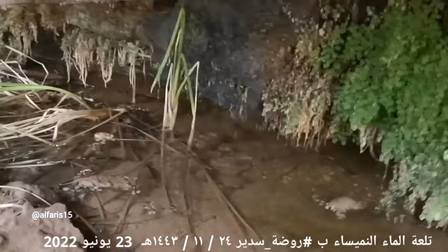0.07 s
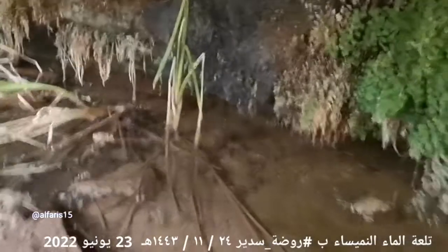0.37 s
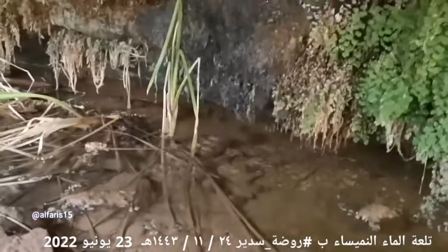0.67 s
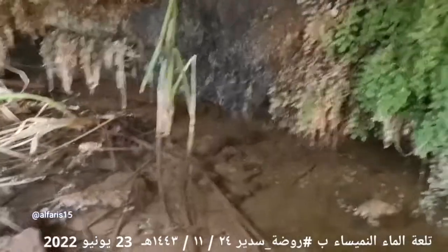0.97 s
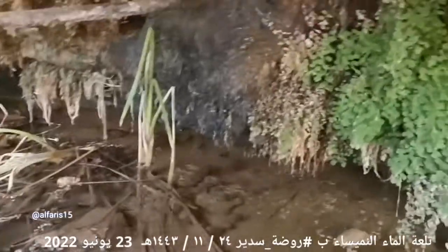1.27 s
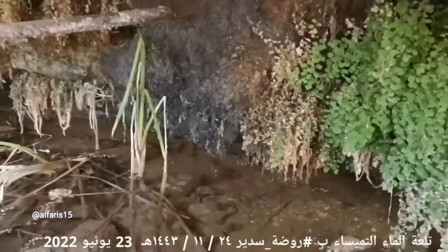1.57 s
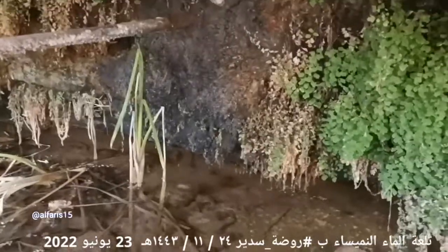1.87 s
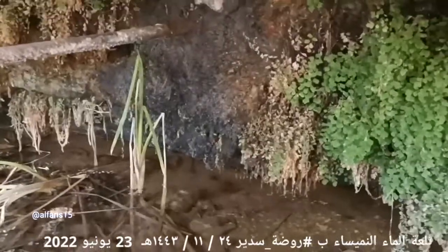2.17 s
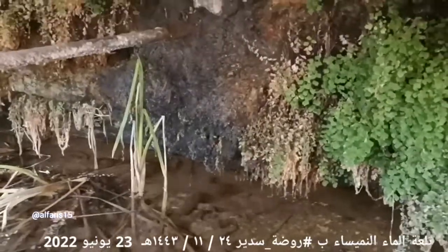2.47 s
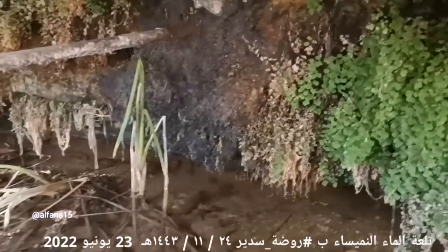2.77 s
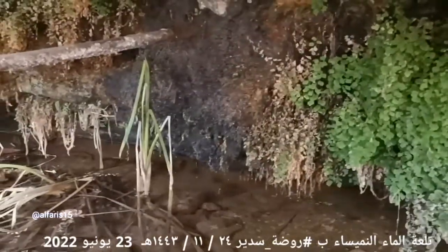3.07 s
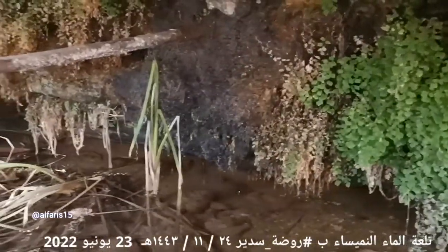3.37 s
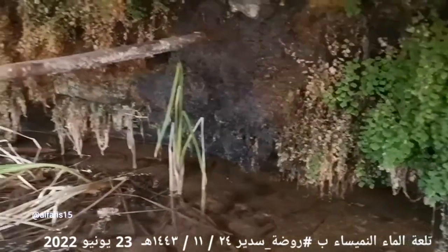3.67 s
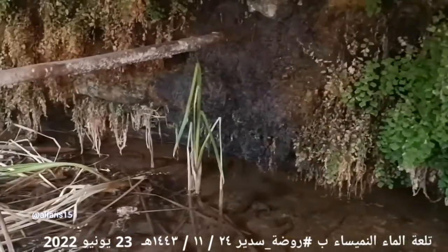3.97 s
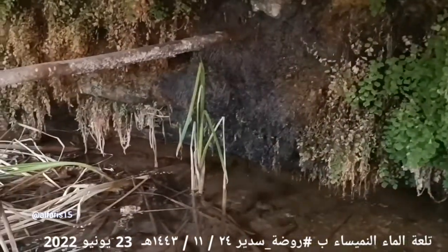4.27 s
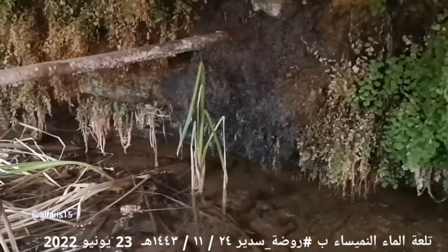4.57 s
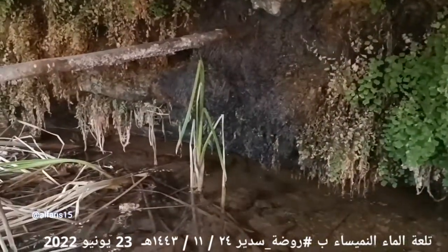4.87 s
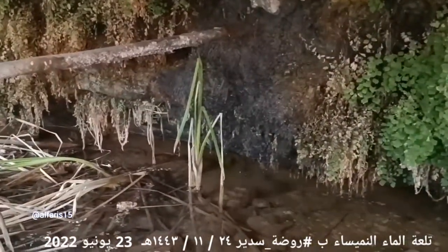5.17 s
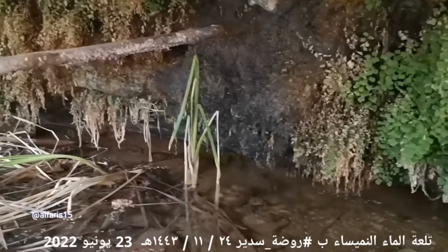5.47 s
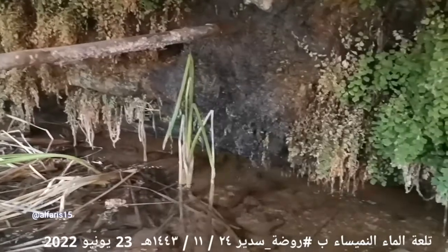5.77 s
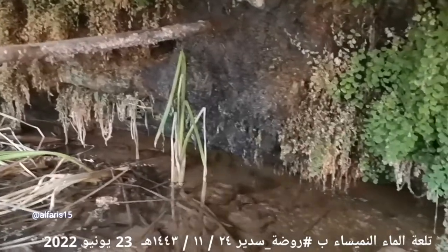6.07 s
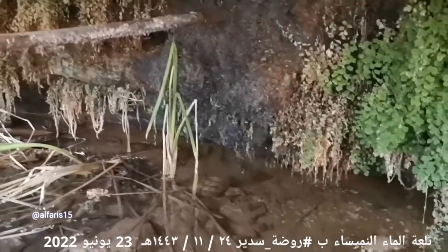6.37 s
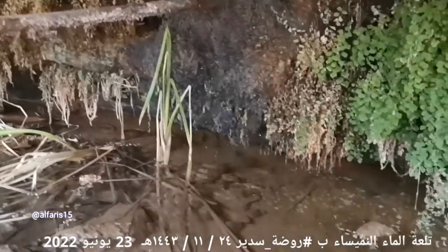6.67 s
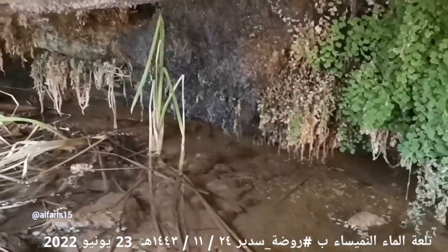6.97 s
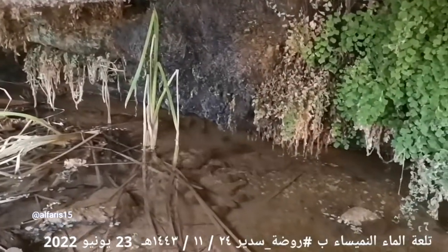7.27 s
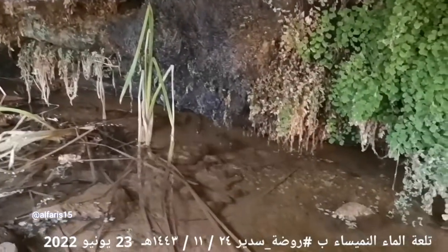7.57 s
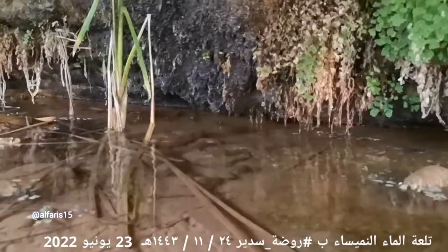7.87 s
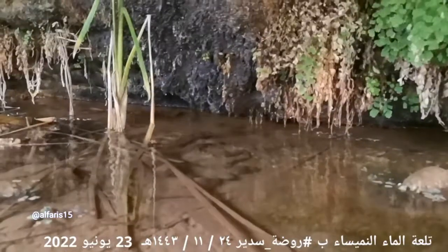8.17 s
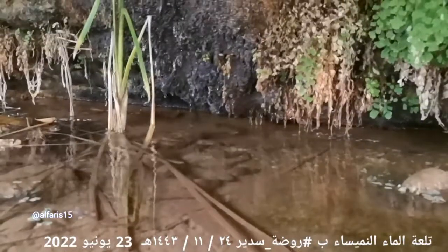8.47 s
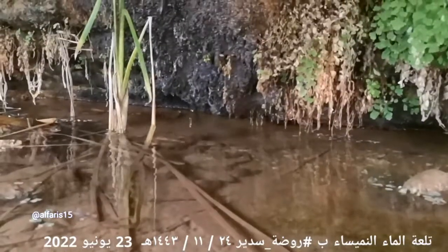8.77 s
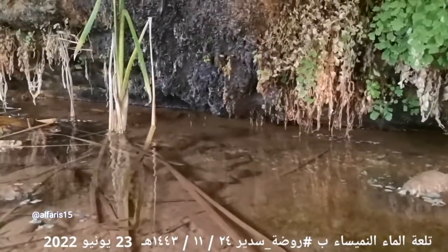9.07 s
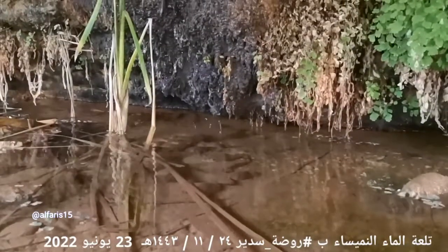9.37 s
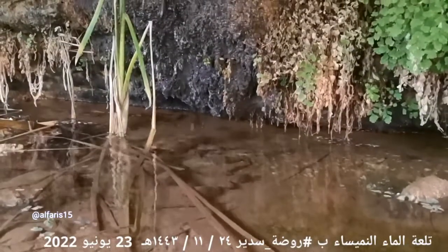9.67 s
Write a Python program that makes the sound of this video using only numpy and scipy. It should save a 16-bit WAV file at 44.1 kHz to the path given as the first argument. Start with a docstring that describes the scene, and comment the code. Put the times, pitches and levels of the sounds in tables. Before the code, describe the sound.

Drops plink into a pool and splat on wet stone while a small bird twitters further off, with one early microphone bump.

```python
"""Water drips from a wet rock wall and hanging roots into a shallow pool, in a rock hollow outdoors.
From the start, seeping water hisses over a low rumble and a small bird twitters further off.
The microphone is bumped almost at once. Then two steady drips and stray drops slap the pool and trap
ringing bubbles, while others splat on stone and leaves. Near the end the sound drops out briefly;
it comes back with a louder hiss and a faint drone, and the dripping goes on."""
import sys
import numpy as np
from scipy import signal
from scipy.fft import rfft, irfft
from scipy.io import wavfile
from scipy.ndimage import uniform_filter1d

SR = 44100
rng = np.random.default_rng(int(sys.argv[2]) if len(sys.argv) > 2 else 0)


def int16_out(signal):
    """Quantize to a 16-bit WAV file."""
    q = np.round(np.clip(np.atleast_2d(signal).T, -1, 1) * 32767)
    wavfile.write(sys.argv[1], SR, q.astype(np.int16))


N = 433062
TIME = np.arange(N) / SR
AGE = np.arange(int(.3 * SR)) / SR  # seconds since one short sound began
DROPOUT_START_S, DROPOUT_END_S = 7.622, 8.022


def undb(db):
    """Turn decibels into a factor to multiply by."""
    return 10 ** (np.asarray(db) / 20)


def unit(x):
    """Scale to an average (rms) level of 1."""
    return x / np.sqrt(np.mean(x ** 2))


def crest(x, size=176):
    """Scale so that the loudest few milliseconds have level 1."""
    power = np.mean(np.atleast_2d(x) ** 2, axis=0)
    return x / np.sqrt(uniform_filter1d(power, size).max())


def fade(t60):
    """A fade that falls by 60 dB in t60 seconds."""
    return np.exp(-np.log(1000) * AGE / max(t60, .002))


def noise(spectrum, size):
    """Noise of level 1, shaped by (frequency [Hz], level [dB]) points."""
    hz, db = np.transpose(spectrum)
    gain = undb(np.interp(np.log(np.fft.rfftfreq(size, 1 / SR) + 1), np.log(hz), db))
    return unit(irfft(rfft(rng.standard_normal(size)) * gain, size))


def burst(spectrum, t60):
    """A crack of noise that swells within a millisecond and dies quickly."""
    return crest(noise(spectrum, len(AGE)) * fade(t60) * (1 - fade(.007)))


def resonate(x, hz, q):
    """Keep the sound near one pitch; a higher q makes the band narrower."""
    return signal.lfilter(*signal.iirpeak(min(hz, SR / 3), max(q, .8), SR), x)


def keep_range(x, kind, hz, order=3):
    """Let only the lows, the highs or a band through."""
    return signal.sosfilt(signal.butter(order, hz, kind, fs=SR, output="sos"), x)


def wander(per_second):
    """A smooth random curve that strays about 1 either way."""
    step = int(SR / per_second)
    return 1.29 * uniform_filter1d(np.repeat(rng.standard_normal(N // step + 1), step), step)[:N]


def add(out, s, x):
    """Mix a stereo sound in at s seconds."""
    start = max(int(s * SR), 0)
    out[:, start:start + x.shape[1]] += x[:, :max(N - start, 0)]


def echoes(wall_db, wall_t60=0.089, tail_db=-17, tail_t60=0.49, lag_s=.00008):
    """The path to the stereo microphone: direct sound, close echoes off the rock and a faint tail."""
    chance = rng.standard_normal((4, len(AGE)))
    close = chance[:2] ** 3 * fade(wall_t60) * (AGE > .002)  # cubing makes noise spiky
    tail = chance[2:] * fade(tail_t60)
    path = (undb(wall_db) * unit(close) + undb(tail_db) * unit(tail)) / np.sqrt(len(AGE))
    path[0, int(lag_s * SR)] += 1  # the direct sound reaches the left side later
    path[1, 0] += 1
    return path


def heard(x, path, pan_db):
    """A sound at the end of a path, level 1 at its loudest. Pan is left level minus right level."""
    echoed = signal.fftconvolve(x[None], path, axes=1)[:, :len(x)]
    return crest(echoed * undb(np.array([[pan_db], [-pan_db]]) / 2))


def far_noise():
    """Low noise from far off, probably traffic, that swells and eases."""
    # its tone: (frequency [Hz], level [dB])
    spectrum = [(40, -32.5), (100, -2), (135, 1.5), (200, -9), (270, -12.5), (400, -28.5), (1500, -64)]
    # its swell: (time [s], level [dB])
    swell = [(0, -73.5), (2.6, -68), (4.5, -62), (6, -64), (7.6, -67)]
    return noise(spectrum, N) * undb(np.interp(TIME, *np.transpose(swell)))


def drone(q=9):
    """A faint, wavering far drone: noise narrowed to a few low pitches."""
    # its resonances: (pitch [Hz], level [dB])
    tones = [(97, -57.5), (167, -61.5), (255, -74.5)]
    return sum(undb(db) * unit(resonate(resonate(rng.standard_normal(N), hz, q), hz, q))
               for hz, db in tones)


def rumble_and_hiss(spectrum, rumble_db, hiss_db, swell_db=1.5, flicker_db=1.85):
    """Air rumbles at the microphone, alike on both sides; trickling water hisses all around."""
    # the rumble's rise and fall: (time [s], relative level [dB])
    rumble_curve = [(0, -45), (0.08, -57), (0.55, -61), (2.3, -61), (4.4, -62.5), (5.2, -57.5),
                    (5.45, -54.5), (5.8, -59.5), (6.4, -54), (6.9, -60), (7.3, -57.5), (9.8, -57)]
    middle = noise(spectrum, N)
    side = 1.01 * keep_range(noise(spectrum, N), "high", 300, order=2)
    stereo = np.array([middle + side, middle - side])
    lows = signal.sosfiltfilt(signal.butter(2, 400, fs=SR, output="sos"), stereo)
    rumble = lows / keep_range(middle, "band", [40, 300]).std()
    hiss = (stereo - lows) / keep_range(middle, "band", [1500, 10000]).std()
    rumble *= undb(np.interp(TIME, *np.transpose(rumble_curve)) + rumble_db + swell_db * wander(5))
    return rumble + hiss * undb(hiss_db + flicker_db * wander(22))


def background():
    """Rumble and hiss, with far noise before the dropout and a drone after it."""
    # tone of the air and trickle before the dropout: (frequency [Hz], level [dB])
    early_spectrum = [(12, -54.5), (20, 6.5), (45, 1), (120, -7), (262, -22.5), (399, -32), (590, -37.5),
                      (2020, -29.5), (3340, -40.5), (5230, -39), (6360, -43.5), (7730, -37), (10200, -51),
                      (14700, -51.5), (16000, -52.5)]
    # their tone after it: (frequency [Hz], level [dB])
    late_spectrum = [(12, -57), (20, 12.5), (86, -1), (134, -8.5), (172, -6), (255, -14.5), (422, -27.5),
                     (660, -34.5), (2080, -26), (4300, -31), (7520, -30), (9140, -34), (10800, -45.5),
                     (14700, -46), (16000, -67)]
    early = rumble_and_hiss(early_spectrum, rumble_db=2.5, hiss_db=-72) + far_noise()
    late = rumble_and_hiss(late_spectrum, rumble_db=1, hiss_db=-63) + drone()
    return np.where(TIME < DROPOUT_END_S, early, late)


def splat(hz, t60=0.015, q=1.53, spray_db=-1, snap_db=-20):
    """A drop snaps on a wet surface and throws a spray of tiny droplets."""
    chance = rng.standard_normal((2, len(AGE)))
    snap = crest(chance[0] * fade(0.0074))
    spray = undb(spray_db) * crest(chance[1] ** 3 * fade(t60) * (1 - fade(0.0025)))
    wet = resonate(resonate(snap + spray, hz, q), hz, q)
    wet = keep_range(wet, "low", 9300, order=4)
    return crest(wet) + undb(snap_db) * crest(resonate(snap, hz, 1))


def seepage(spatter_db=-71, moss_db=-70, spread_db=4, count=250):
    """Many faint drips all along the wall: fine spatter, and dull pats on moss."""
    out = np.zeros((2, N))
    for when, size, pitch, side, kind in rng.random((count, 5)):
        if kind < .8:
            drip, db = splat(3800 + 4800 * np.sqrt(pitch), q=2.6), spatter_db
        else:
            drip, db = splat(1750 + 650 * pitch, q=4.4), moss_db
        db += spread_db * min(-np.log(1 - size), 3)  # a few drips stand out
        path = echoes(wall_db=2.5, wall_t60=0.097, lag_s=.0004)
        add(out, when * N / SR, undb(db) * heard(drip, path, pan_db=10 * side - 7))
    return out


def bird_notes(gap_s=.048, lower_hz=221.3, growth_db=5.5):
    """Time, level and pitch of each note: lead-in notes grow louder, then a higher one ends the call."""
    # calls: (last note's time [s], its level [dB], its pitch [Hz], note count, lead-in against it [dB])
    calls = [(0.075, -47.5, 5030, 2, 2), (1.356, -51.5, 5030, 3, -3), (2.229, -50, 4940, 3, -7),
             (2.941, -49.5, 4940, 2, -10), (3.15, -61.5, 4920, 2, -6), (3.746, -43.5, 4860, 2, -8),
             (4.55, -47, 5124, 4, -7.5), (5.12, -43.5, 4790, 2, -19), (5.977, -50, 5030, 3, -3.5),
             (6.571, -50, 4870, 2, -8.5), (6.772, -60.5, 4850, 2, -8), (7.354, -53, 5050, 2, -10),
             (8.816, -54, 4940, 2, -14), (9.263, -59, 4930, 2, -16), (9.744, -60, 5050, 2, -10)]
    for s, db, hz, count, lead_db in calls:
        yield s, db, hz
        for k in range(round(count) - 1):  # counting back from the last note
            yield s - (k + 1) * gap_s, db + lead_db - k * growth_db, hz - lower_hz


def bird(gain_db=-1, glide_s=0.0091, width_s=.0065, peak_s=.022, fall_hz=280, rough_hz=110):
    """Short whistled notes that flick downward, scattered by the rock."""
    out = np.zeros((2, N))
    from_peak = AGE - peak_s
    for s, db, hz in bird_notes():
        waver = rough_hz * noise([(400, -5.5), (1500, -22)], len(AGE))
        pitch = hz - fall_hz * np.tanh(from_peak / glide_s) + waver
        note = np.sin(2 * np.pi * np.cumsum(pitch) / SR) * np.exp(-(from_peak / width_s) ** 2)
        path = echoes(wall_db=5, wall_t60=0.069, tail_db=-23.5, lag_s=.00042)
        add(out, s - peak_s - .004, undb(db + gain_db) * heard(note, path, pan_db=-2))
    return out


def ring(hz, t60, rise=0.007, swell_cycles=9):
    """The ring of a bubble, crater or case: it swells fast, then fades as its pitch rises a little."""
    pitch = hz * (1 + rise * (.5 - fade(t60 * 2)))
    tone = np.sin(2 * np.pi * np.cumsum(pitch) / SR) * fade(t60) * (1 - fade(swell_cycles / hz))
    return crest(keep_range(tone, "high", .75 * hz))


def microphone_bump(sway_db=-31.5, sway_hz=25, sway_t60=0.74, thump_db=-38, thump_t60=.66):
    """Knocks ring the microphone's case briefly; the jolt leaves a thump and a deep sway."""
    # knocks: (time [s], level [dB], ring pitch [Hz], ring fade time [s], crack against ring [dB])
    knocks = [(0.2675, -24.5, 1998, 0.017, -4), (.278, -39, 2100, .02, -14),
              (0.2807, -31.5, 1510, 0.016, 6), (0.2839, -35, 920, 0.019, -2)]
    # tone of the case's crack: (frequency [Hz], level [dB])
    case_spectrum = [(60, -9), (170, 1.5), (300, -13), (600, -12.5), (950, -7.5), (2200, -1.5),
                     (3000, -17.5), (6000, -14.5), (8500, -18.5), (10000, -47), (16000, -52)]
    out = np.zeros((2, N))
    for s, db, hz, t60, crack_db in knocks:
        knock = ring(hz, t60) + undb(crack_db) * burst(case_spectrum, t60=0.073)
        add(out, s, undb(db) * heard(knock, echoes(wall_db=-10.5, tail_db=-14.5), pan_db=-6))
    sway = undb(sway_db) * np.sqrt(2) * np.sin(2 * np.pi * sway_hz * AGE) * fade(sway_t60)
    low_noise = noise([(8, -30.5), (30, 7.5), (60, -0.5), (150, -9), (400, -40), (2000, -95)], len(AGE))
    thump = undb(thump_db) * low_noise * fade(thump_t60) * (1 - fade(.02))
    add(out, .277, np.tile(sway + thump, (2, 1)))
    return out


def plinks(level_db=-65, spread_db=6, low_hz=2800, high_hz=3800, ring_t60=.014, count=16):
    """Small drops trap tiny bubbles that ring high."""
    out = np.zeros((2, N))
    for when, size, pitch in rng.random((count, 3)):
        bubble = ring(low_hz + (high_hz - low_hz) * pitch, ring_t60)
        plink = heard(bubble, echoes(wall_db=0.5, wall_t60=0.036), pan_db=1)
        add(out, when * N / SR, undb(level_db + spread_db * (size - .5)) * plink)
    return out


def splats(gain_db=1.5, pan_db=-1.5):
    """Drops land on stone and leaves and echo off the wall."""
    # landings: (time [s], relative level [dB], strongest frequency [Hz])
    landings = [(0.4293, -59, 6940), (0.699, -49, 6140), (1.051, -60, 6500), (1.326, -55, 7700),
                (1.7404, -58, 5550), (1.8197, -62, 5440), (2.045, -60, 9500), (2.0793, -64.5, 9400),
                (2.293, -60.5, 5940), (3.2283, -56, 4530), (3.3902, -55, 5670), (3.4903, -60, 7100),
                (3.5292, -59, 7000), (3.8557, -43, 5100), (3.897, -52, 5500), (3.971, -56, 8600),
                (4.7438, -56, 4830), (4.9358, -38, 5830), (5.026, -55, 8600), (5.108, -55.5, 7900),
                (5.447, -60, 8160), (5.715, -60.5, 6960), (6.631, -55, 7500), (7.012, -48, 7500),
                (7.071, -58, 7900), (7.117, -58, 7900), (7.163, -56.5, 9100), (8.024, -54, 6900),
                (8.272, -55, 5500), (8.695, -57, 7150), (9.2746, -58, 7100), (9.6087, -54, 7000)]
    out = np.zeros((2, N))
    for s, db, hz in landings:
        landing = heard(splat(hz), echoes(wall_db=2.5, wall_t60=0.099, lag_s=0.00045), pan_db)
        add(out, s, undb(db + gain_db) * landing)
    return out


def pool_drop(bubble_db, hz, slap_db, tick_db, pan_db, slap_path, crater_hz=1020, crater_db=-16.5):
    """A drop ticks on the water, slaps open a briefly ringing crater and leaves a bubble."""
    # tone of the slap: (frequency [Hz], level [dB])
    slap_spectrum = [(300, -62), (750, -42), (1000, -31.5), (1400, 4), (1900, 6), (2200, 5), (2600, 2.5),
                     (3100, -13.5), (6000, -33)]
    # tone of the tick: (frequency [Hz], level [dB])
    tick_spectrum = [(600, -62), (1500, -28), (3000, 5), (4500, 1), (8000, -1), (10000, -13), (16000, -22)]
    bubble = ring(hz, t60=.045 * (1000 / hz) ** 1.36)  # big, low bubbles ring longer
    bubble = heard(bubble, echoes(wall_db=3.5, wall_t60=0.091, lag_s=.00016), pan_db)
    crater = undb(crater_db) * ring(crater_hz, t60=0.12)
    slap = heard(burst(slap_spectrum, t60=0.021) + crater, slap_path, pan_db)
    tick = burst(tick_spectrum, t60=0.0082)
    tick = heard(tick, echoes(wall_db=6.5, wall_t60=0.14, lag_s=.0004), pan_db / 2)
    return undb(bubble_db) * bubble + undb(slap_db) * slap + undb(tick_db) * tick


def beats(runs):
    """Time and pan of each drop of a steady drip: one run before the dropout, one after."""
    for (first, period, pan_db), end in zip(runs, (DROPOUT_START_S, N / SR)):
        for s in np.arange(first, end, period):
            yield s, pan_db


def pool(gain_db=-0.5):
    """Two spots drip into the pool like clocks, one quick and one slow, among stray drops."""
    # runs of the quick drip: (first drop [s], time between drops [s], pan [dB])
    quick_runs = [(0.4105, 0.4966, -5.5), (8.442, 0.5035, 1)]
    # runs of the slow drip: (first drop [s], time between drops [s], pan [dB])
    slow_runs = [(0.427, 0.8504, -10), (8.025, 0.847, -8)]
    # each quick drop traps its own bubble: (delay [s], bubble [dB], pitch [Hz], slap [dB], tick [dB])
    quick_drops = [(.002, -47, 2500, -47, -71), (0, -52.5, 1216, -52, -61),
                   (-.001, -40.5, 2198, -44, -55.5), (0.00062, -42, 1060, -51.5, -67),
                   (.001, -51.5, 2500, -44, -54), (.002, -42.5, 1320, -49, -53),
                   (0, -49.5, 1116, -50.5, -72), (-0.00057, -44, 990, -47, -51),
                   (-.001, -53.5, 1000, -41.5, -54.5), (-.003, -34, 2250, -38.5, -58),
                   (.001, -44, 1028, -49.5, -58), (0, -52.5, 1150, -50, -60), (.008, -52, 1380, -59, -68),
                   (0, -50, 2510, -50, -55.5), (.004, -43.5, 1350, -55.5, -78), (0, -44, 1360, -51.5, -55),
                   (0, -37.5, 1640, -47, -51), (0, -37, 1206, -47, -50.5)]
    # stray drops: (time [s], bubble [dB], pitch [Hz], slap [dB], pan [dB])
    stray_drops = [(0.347, -51, 2040, -42.5, -7), (0.394, -54, 1050, -54, -1), (0.432, -51, 2110, -52, 0),
                   (0.599, -56, 2720, -78, -2), (0.7262, -53.5, 1270, -58, -5),
                   (1.222, -58.5, 2090, -73, -9), (1.641, -49, 2500, -74, -1),
                   (1.808, -63, 2190, -60.5, -3), (2.327, -58.5, 2200, -68, -10),
                   (3.322, -50.5, 1226, -54, -3), (3.346, -55.5, 1155, -59, -3),
                   (3.507, -56, 2360, -78, -5), (3.7322, -35.5, 2300, -62, -4),
                   (4.207, -69, 2090, -56, -13), (4.643, -51, 2350, -86, -15.5),
                   (4.75, -61.5, 3870, -78, 3), (4.892, -50.5, 2290, -61, 0),
                   (6.214, -43.5, 2210, -48.5, -4), (6.234, -52.5, 1264, -58, -8),
                   (7.038, -56, 3250, -59.5, 3), (7.178, -57, 1033, -72, -5), (8.272, -55, 2070, -67, -6),
                   (8.315, -52, 1900, -61, -3)]
    out = np.zeros((2, N))
    path = echoes(wall_db=-2.5, wall_t60=0.15, lag_s=0.00014)
    for (s, pan_db), (delay, bubble_db, hz, slap_db, tick_db) in zip(beats(quick_runs), quick_drops):
        add(out, s + delay, pool_drop(bubble_db, hz, slap_db, tick_db, pan_db, path))
    for s, pan_db in beats(slow_runs):  # the slow drip sounds alike every time
        drop = pool_drop(bubble_db=-50.5, hz=2090, slap_db=-64.5, tick_db=-65.5,
                         pan_db=pan_db, slap_path=path)
        add(out, s, drop)
    for s, bubble_db, hz, slap_db, pan_db in stray_drops:
        tick_db = bubble_db - 18.5
        add(out, s, pool_drop(bubble_db, hz, slap_db, tick_db, pan_db, path))
    return undb(gain_db) * out


def scene():
    """The water, the bird and the bump over the background."""
    return background() + pool() + splats() + plinks() + seepage() + bird() + microphone_bump()


def record(dry):
    """Silence the sound during the dropout and cut the highest treble."""
    top_hz = 15700
    sound_on = (TIME < DROPOUT_START_S) | (TIME > DROPOUT_END_S)
    soft_switch = uniform_filter1d(sound_on * 1., size=64)
    return signal.sosfilt(signal.ellip(8, .2, 70, top_hz, fs=SR, output="sos"), dry * soft_switch)


dry = scene()
out = record(dry)
int16_out(out)
```